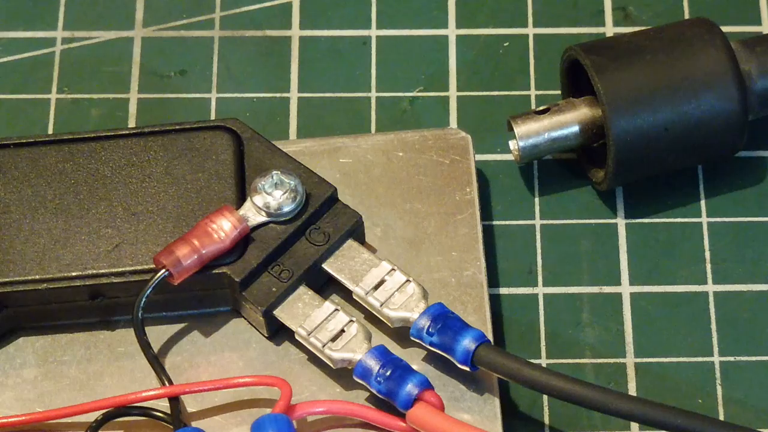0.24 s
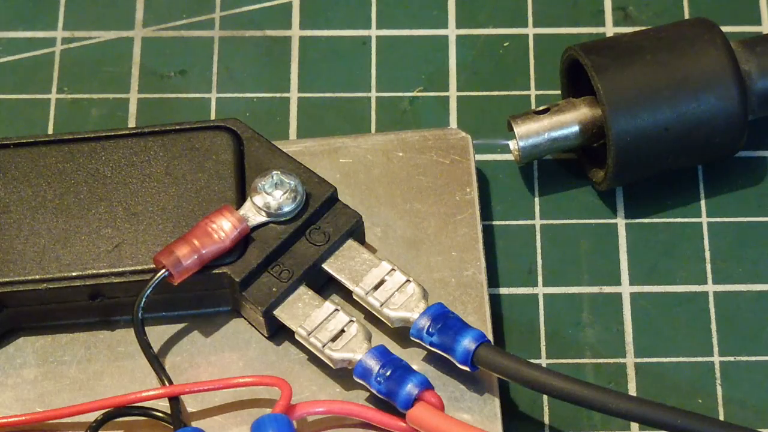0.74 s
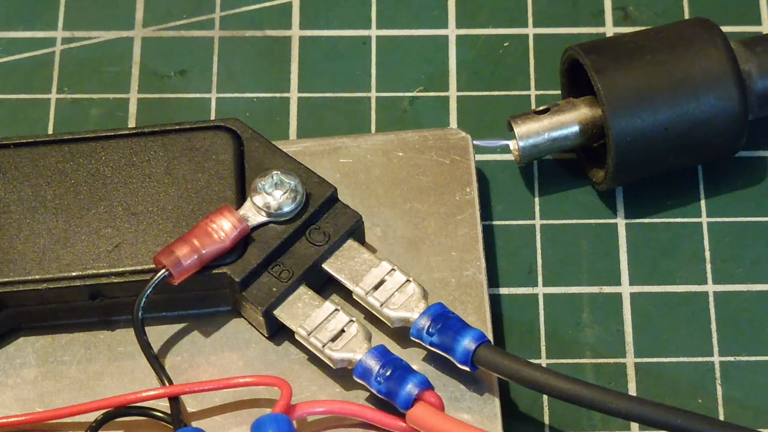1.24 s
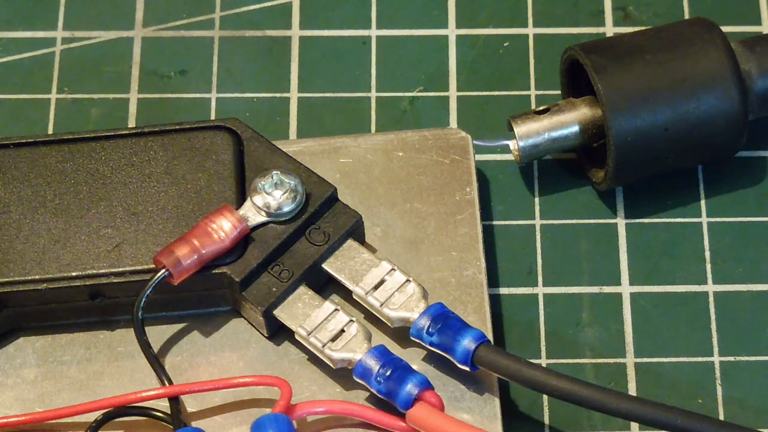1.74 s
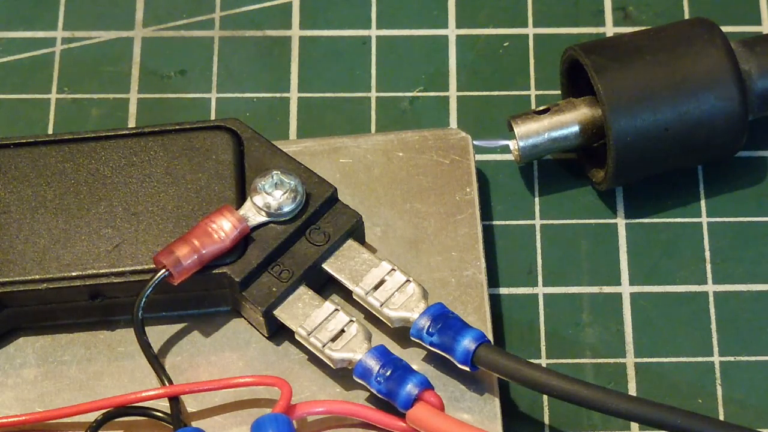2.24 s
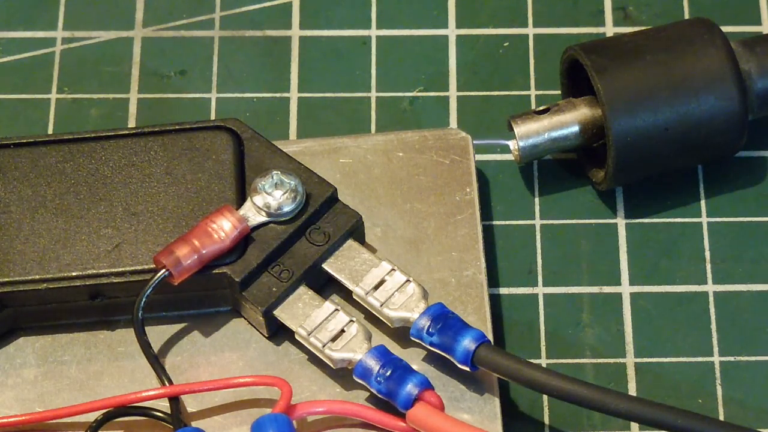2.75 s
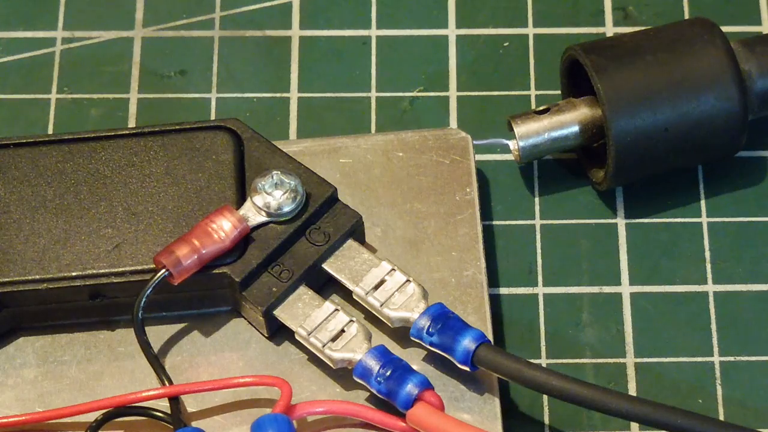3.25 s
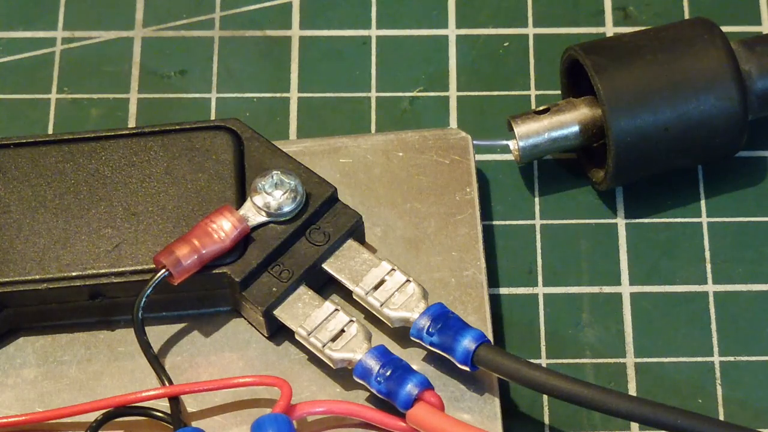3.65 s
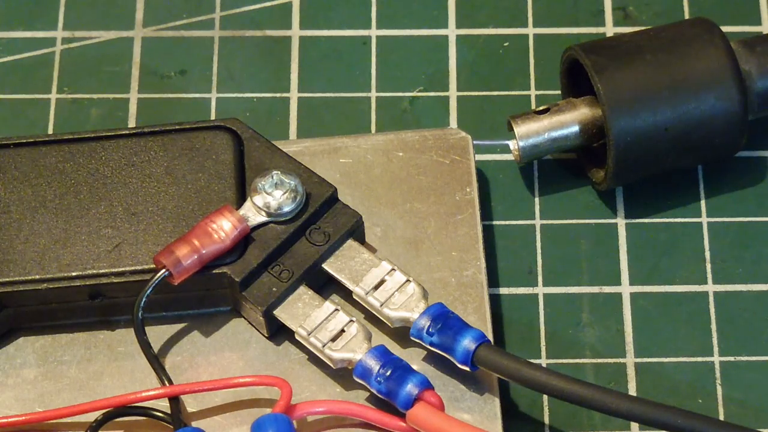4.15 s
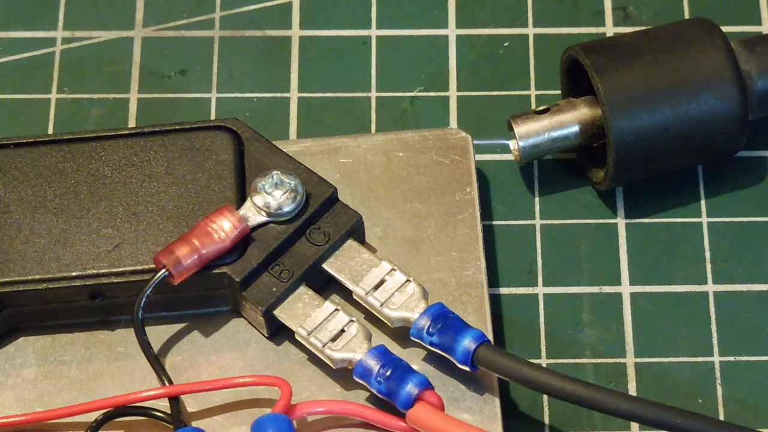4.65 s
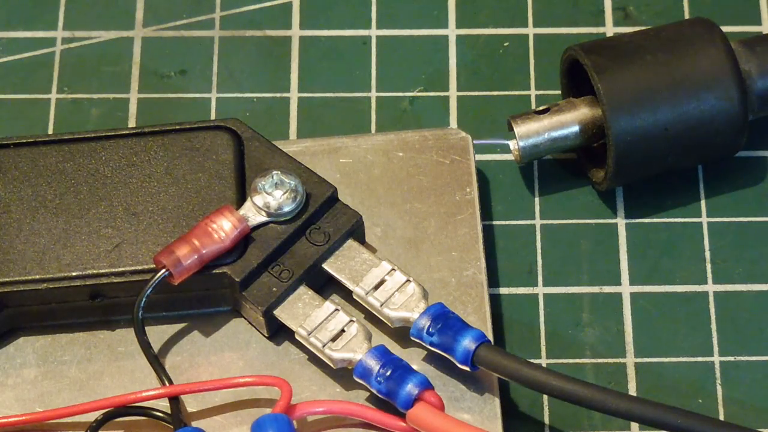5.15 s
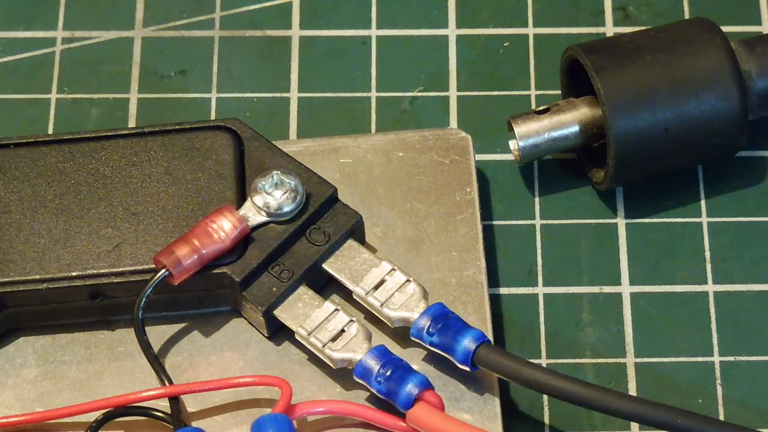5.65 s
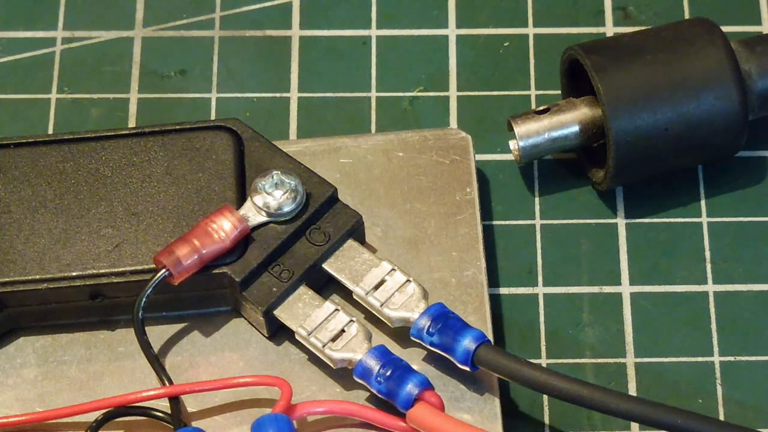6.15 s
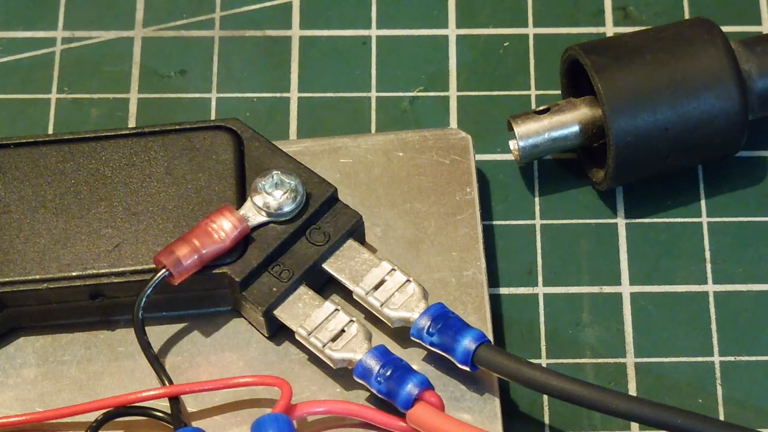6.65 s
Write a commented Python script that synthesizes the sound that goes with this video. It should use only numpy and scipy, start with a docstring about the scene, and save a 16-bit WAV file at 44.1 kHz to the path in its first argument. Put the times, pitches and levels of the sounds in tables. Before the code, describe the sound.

Close, dry electric snaps jump from an ignition coil lead to a metal plate in a small workshop. A single spark comes first, then rapid ticking accelerates into a steady buzz with a fizzy edge and a slight low hum. The rate then falls away gradually, ending in evenly spaced, separate snaps over faint background hiss.

```python
"""Ignition coil sparking on a workbench

A coil throws sparks from its lead to a metal plate. After one lone spark, its driver is turned up from
14 sparks a second to its top speed of about 49, held there, then slowly turned down.
Every spark is one sharp pulse of air pressure, heard as a snap. The bench, the parts on it and a small
room colour the snap and throw it back, over a faint hiss."""
import sys
import numpy as np
from scipy import signal
from scipy.fft import irfft
from scipy.io import wavfile

SR = 44100
rng = np.random.default_rng(int(sys.argv[2]) if len(sys.argv) > 2 else 0)


def materialize(psi):
    """Save the field psi as 16-bit PCM at rate SR to the path in sys.argv[1].

    A 1-D psi becomes a single channel; in a 2-D psi each row is a channel.
    """
    bounded = np.clip(np.atleast_2d(psi).T, -1, 1)
    quanta = np.round(bounded * 32767).astype(np.int16)
    wavfile.write(sys.argv[1], SR, quanta)


N = 304290
LONE_SPARK_S, RUN_START_S = 0.0543, 0.2222
HZ = np.fft.rfftfreq(16384, 1 / SR)  # the frequencies at which tone curves are drawn


def spark_times():
    """One lone spark, then the coil fires each time the wait set on the driver's dial has run out."""
    # the dial, turned up to its end stop, held, then turned back: (time [s], wait between sparks [ms])
    dial = [(0.22, 73.07), (0.55, 48.66), (0.76, 47.25), (0.98, 37.51), (1.16, 34.25), (1.47, 23.6),
            (1.51, 20.601), (3.25, 20.601), (3.3, 22.93), (3.95, 33.37), (4.03, 36.16), (4.17, 37.07),
            (4.53, 43.62), (4.72, 51.85), (4.86, 53.48), (5.48, 72.95), (5.92, 101.16), (6.9, 133.7)]
    t = np.arange(RUN_START_S, N / SR, 1 / SR)
    wait_s = np.interp(t, *np.transpose(dial)) / 1000
    cycles = np.cumsum(1 / wait_s) / SR
    run = np.interp(np.arange(int(cycles[-1]) + 1), cycles, t)  # a spark at each whole cycle
    return np.append(LONE_SPARK_S, run)


def spark_train(times, level_db=1.89, spread_db=0.44, lone_db=-2.1, sharpness_spread=0.092):
    """Each spark takes its own path through the air, so its pulse differs in strength and sharpness."""
    strength, sharpness = rng.standard_normal((len(times), 2)).T
    size = amp(level_db + spread_db * strength + lone_db * (times < RUN_START_S))
    edge = np.diff(clicks(times, size * sharpness_spread * sharpness), prepend=0)
    return clicks(times, size) + edge


def bench(pulses):
    """The direct pulse and its quick bounces off nearby surfaces, with the treble softened."""
    # echoes from the plate, the bench and things close by: (delay [ms], gain [factor, minus flips it])
    reflections = [(0.224, -0.38), (0.659, -0.24), (0.915, -0.09), (1.19, 0.28), (1.67, 0.26),
                   (2.01, -0.25), (3.496, 0.29), (4.209, -0.13), (5.267, 0.09), (6.637, 0.23),
                   (7.098, 0.08), (7.656, -0.1)]
    delay_ms, gain = np.transpose(reflections)
    delays = np.exp(-2j * np.pi * np.outer(delay_ms / 1000, HZ))
    response = irfft(1 + gain @ delays)  # the 1 is the direct pulse
    near = convolve(pulses, response[:len(HZ) // 2])
    return shelf(near, low_db=-.2, high_db=-6, corner_hz=6000)


def snap_tone(x):
    """The bench and microphone ring at some pitches and cancel others, shaping every snap alike."""
    # overall tone of one snap: (frequency [Hz], gain [dB])
    snap = [(60, -47), (150, -25.5), (230, 4), (400, -6.5), (600, -7), (1200, -4), (2500, 1), (4000, 0.5),
            (6000, -7.5), (7200, 1.5), (9500, -5), (11500, -2), (12300, -9), (13200, -44)]
    # narrow peaks (+) and dips (-) of the bench and microphone: (frequency [Hz], width [Hz], gain [dB])
    resonances = [(492.9, 21.3, 11.5), (571, 27, 2), (622, 18.6, -18), (679, 167, 9.5), (832.4, 32, 5.5),
                  (927, 11.6, -14), (970, 33, 7), (1110, 90, 2.5), (1204, 13, -26.5), (1304, 16, 10),
                  (1411, 29, 11), (2034, 29, 8), (2170, 20, -18), (2366, 58, -7), (2409, 40, 8),
                  (2563, 22, 6.5), (3038, 41, 8), (3960, 230, 4.5), (4517, 930, -5), (5300, 310, 4.5),
                  (5800, 61, -5), (5904, 204, 10.5), (6790, 150, -4.5), (7490, 61, -14), (7850, 67, 5.5),
                  (8250, 300, -21), (9360, 160, 7), (9760, 150, -5)]
    return colour(x, read(snap, HZ) + bumps(resonances))


def clutter(pulses, fade_s=.06, rise_s=.0015):
    """Countless weak echoes from tools and wires; such small things scatter mostly the treble."""
    t = np.arange(SR // 4) / SR
    response = rng.choice([-1., 1.], len(t)) * decay(t, fade_s) * (1 - np.exp(-t / rise_s))
    echoes = convolve(pulses, response / np.linalg.norm(response))
    return shelf(echoes, low_db=-11, high_db=0, corner_hz=4300)


def sizzle(pulses, times, fade_s=.16, spread_db=1.2):
    """A short fizz, new with every spark and stronger in some, roughens the treble of the snap."""
    spark_gains = amp(spread_db * rng.standard_normal(len(times)))
    strength = np.interp(np.arange(N) / SR, times, spark_gains)
    power = decay(np.arange(SR // 4) / SR, fade_s) ** 2
    loudness = np.sqrt(abs(convolve((strength * pulses) ** 2, power / power.sum())))
    return shelf(loudness * rng.standard_normal(N), low_db=-10.5, high_db=-5, corner_hz=6300)


def room(pulses, level_db=-12.5, rise_s=.014):
    """The room's echoes blur into a tail that builds up, then fades at its own speed at each pitch."""
    # how long the workshop echoes: (frequency [Hz], time to fade by 60 dB [s])
    fade_times = [(250, .3), (800, .19), (3000, .25), (12000, .25)]
    hz, t, bands = signal.stft(rng.standard_normal(SR // 2), SR, nperseg=256)
    bands = bands * decay(t, read(fade_times, hz)[:, None]) * (1 - np.exp(-t / rise_s))
    tail = signal.istft(bands, SR, nperseg=256)[1]
    return amp(level_db) * convolve(pulses, tail / np.linalg.norm(tail))


def boom(pulses, rise_s=0.0014):
    """Sparks set the room's low notes ringing: soft knocks that merge into a hum at top speed."""
    # the workshop's low notes: (frequency [Hz], gain [dB], time to fade by 60 dB [s])
    low_notes = [(242, -52.3, .24), (289, -51.5, .18)]
    t = np.arange(SR // 2) / SR
    ring = sum(amp(db) * decay(t, fade_s) * np.sin(2 * np.pi * hz * t) for hz, db, fade_s in low_notes)
    return convolve(pulses, ring * (1 - np.exp(-t / rise_s)))


def background(level_db=-53):
    """Steady noise of room air and microphone hiss."""
    # tone of the hiss: (frequency [Hz], relative level [dB])
    hiss = [(20, -5.5), (90, -3), (200, -2.5), (450, 0), (900, -1.5), (1600, -5), (4000, -10),
            (7500, -11.5), (8500, -9.5), (12000, -13), (13000, -107)]
    # faint whistles in the hiss: (frequency [Hz], width [Hz], boost [dB])
    whistles = [(5020, 260, 8), (7750, 450, 5)]
    noise = colour(rng.standard_normal(N), read(hiss, HZ) + bumps(whistles))
    return amp(level_db) * noise / noise.std()


def amp(db):
    """Turn decibels into a factor to multiply by."""
    return 10 ** (np.asarray(db) / 20)


def decay(t, fade_s):
    """A level that falls by 60 dB in fade_s seconds."""
    return np.exp(-np.log(1000) * t / fade_s)


def clicks(times, sizes, reach=16):
    """Pulses placed at their exact times, even between two samples."""
    at = times[:, None] * SR
    index = at.astype(int) + np.arange(-reach, reach + 1)
    taper = np.cos(np.pi * (index - at) / (2 * (reach + 1))) ** 2
    shape = np.sinc(index - at) * taper
    return np.bincount(index.ravel(), (sizes[:, None] * shape).ravel(), N)[:N]


def read(points, hz):
    """Look up hz in a table, joining its points by straight lines on a pitch scale."""
    point_hz, value = np.transpose(points)
    return np.interp(np.log(hz + 1), np.log(point_hz + 1), value)


def bumps(rows):
    """A tone curve in dB with one peak or dip for each row."""
    return sum(db / (1 + (2 * (HZ - hz) / width) ** 2) for hz, width, db in rows)


def convolve(x, response):
    """Give every sample of x this response, and cut the result to the scene's length."""
    return signal.fftconvolve(x, response)[:N]


def colour(x, curve_db):
    """Shape x by a tone curve, with a filter that rings only after a click, never before."""
    log_gain = np.log(amp(np.concatenate([curve_db, curve_db[-2:0:-1]])))
    spectrum = np.exp(np.conj(signal.hilbert(log_gain)))
    response = np.fft.ifft(spectrum).real
    return convolve(x, response[:len(HZ)])


def shelf(x, low_db, high_db, corner_hz):
    """One gain for the bass and another for the treble, blending around corner_hz."""
    return colour(x, high_db + (low_db - high_db) / (1 + (HZ / corner_hz) ** 2))


def scene():
    """Sparks with their echoes and fizz, over the room's low notes and the hiss."""
    times = spark_times()
    pulses = spark_train(times)
    snaps = bench(pulses) + clutter(pulses) + sizzle(pulses, times) + room(pulses)
    return (snap_tone(snaps) + boom(pulses) + background())[None]


def record(dry, cutoff_hz=13600):
    """The microphone flips the wave upside down; then the highest treble is cut off."""
    low_pass = signal.firwin(255, cutoff_hz, window=("kaiser", 9), fs=SR)
    return signal.oaconvolve(-dry, low_pass[None], "same")


dry = scene()
out = record(dry)
materialize(out)
```